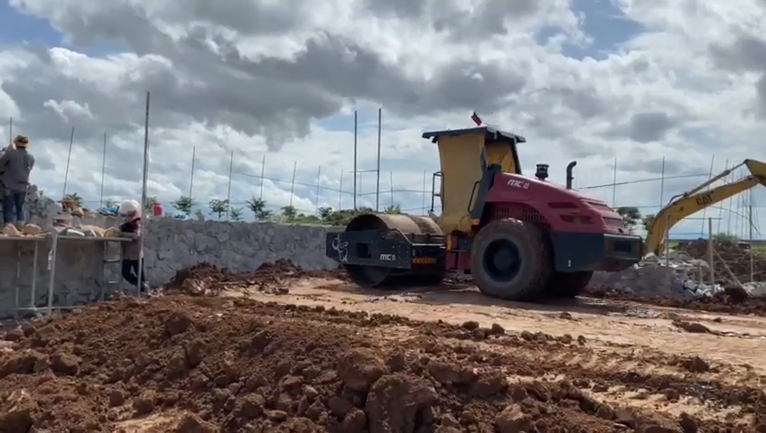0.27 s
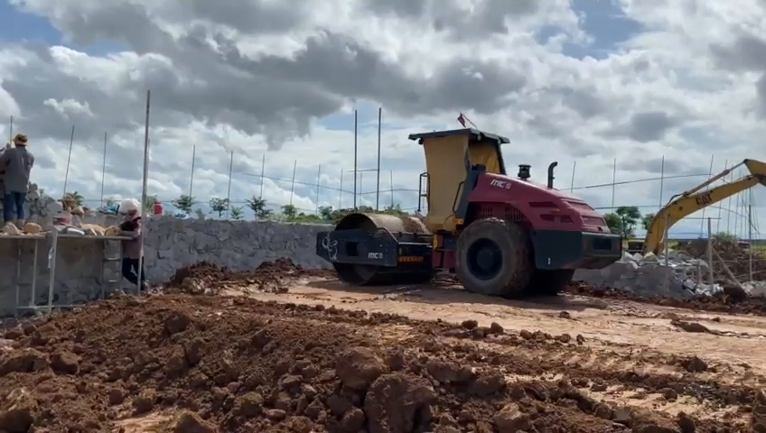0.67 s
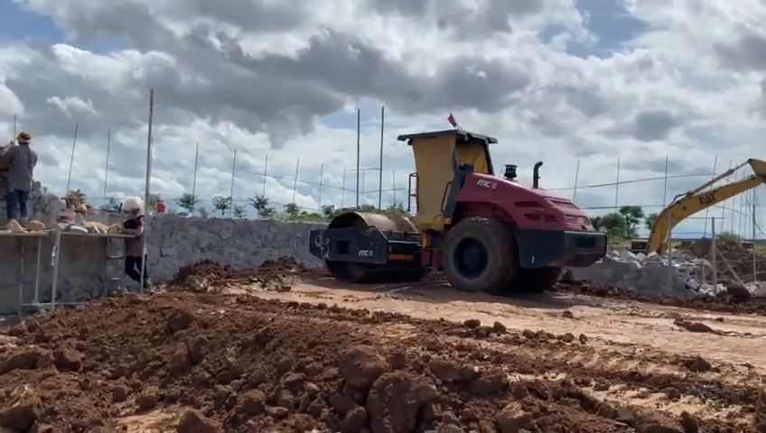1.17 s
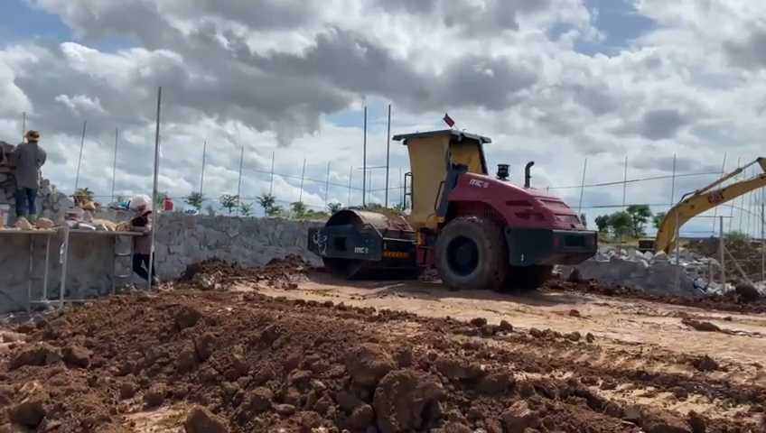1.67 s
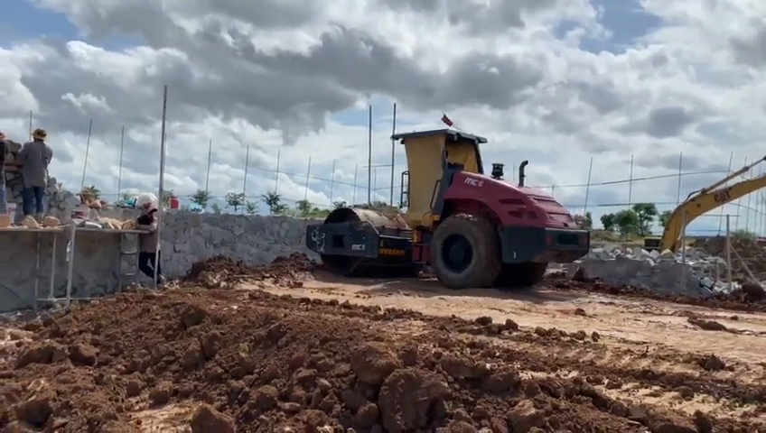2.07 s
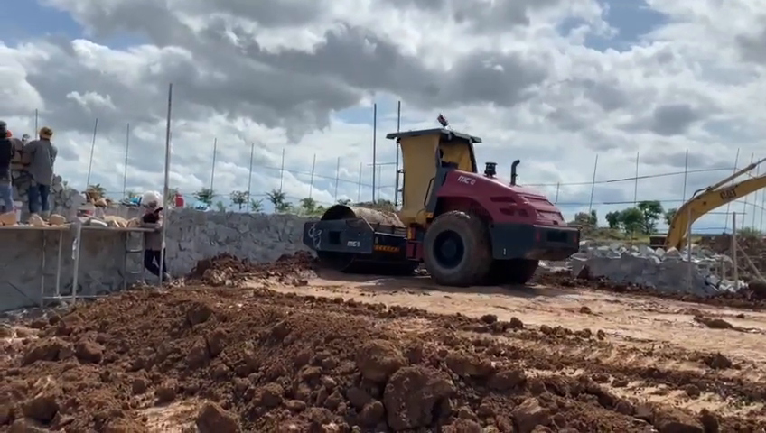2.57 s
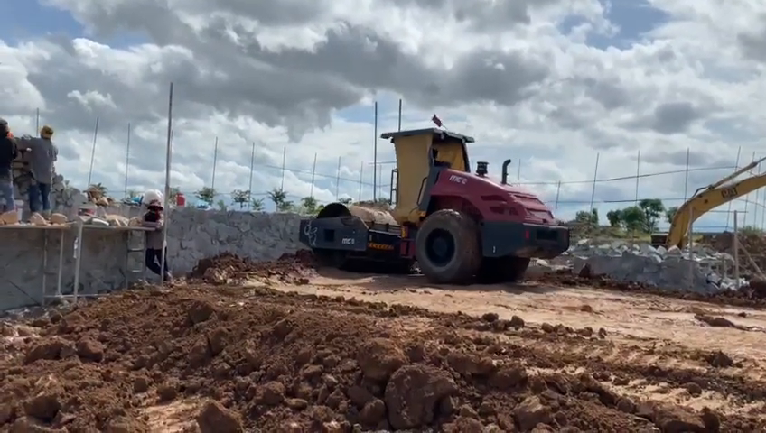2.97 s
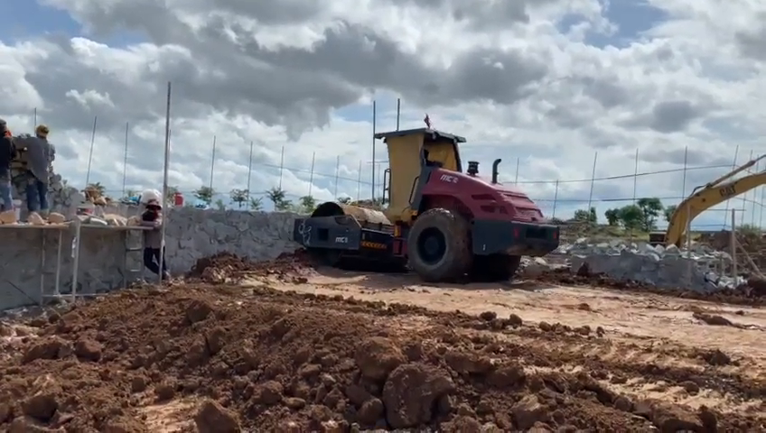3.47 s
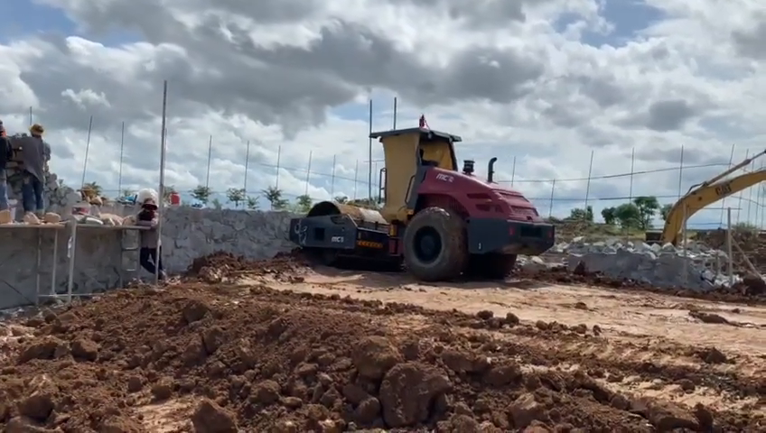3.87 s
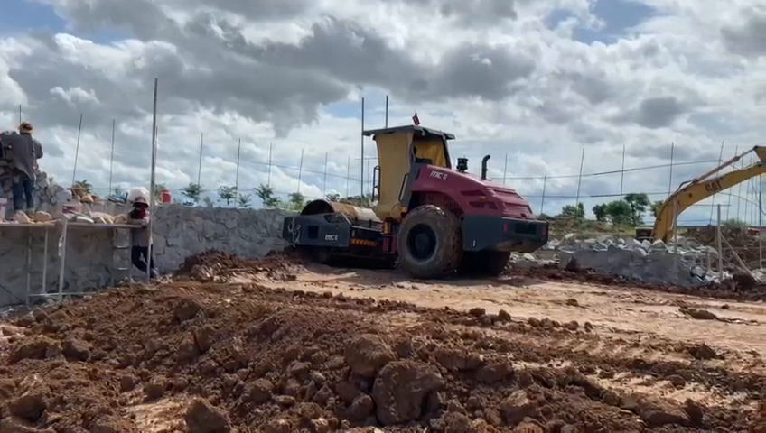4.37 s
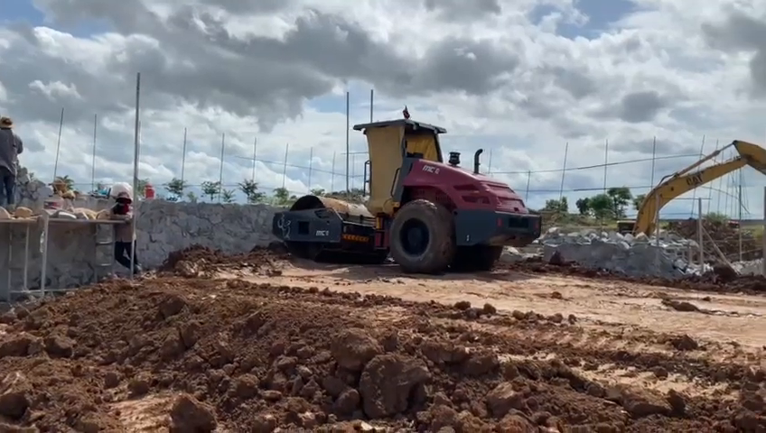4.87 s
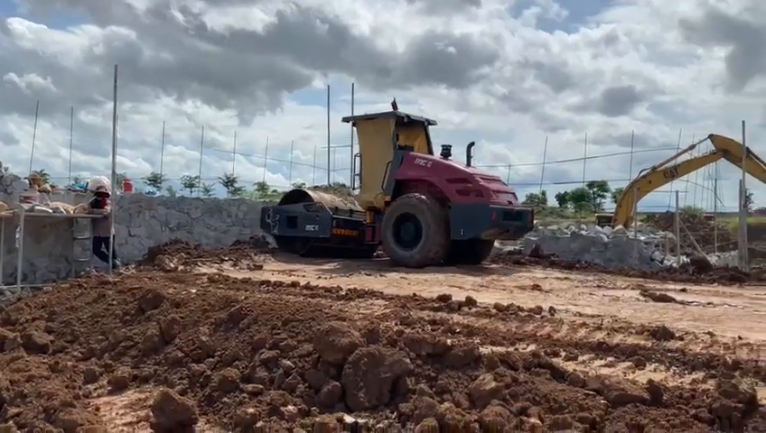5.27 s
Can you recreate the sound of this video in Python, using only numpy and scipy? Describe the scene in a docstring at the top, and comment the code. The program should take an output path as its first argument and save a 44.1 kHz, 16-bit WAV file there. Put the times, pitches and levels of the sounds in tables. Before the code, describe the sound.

A road roller's diesel engine runs for the whole five and a half seconds, a few metres away outdoors. A low exhaust drone and rumble carry a fast, slightly uneven clatter, with drumming hood panels, a light metallic ring and the rush of a cooling fan. The rumble swells briefly at about 0.6 seconds. Slightly harder knocks come through at about 0.4, 1.1 and 2.9 seconds, and the hum is strongest just after 2 seconds. From about 3 seconds the engine speeds up very slightly as it takes load, and a faint high sizzle grows. Near 3.9 seconds a thin, fluttering turbocharger whistle enters, a little to the left. It climbs until about 4.5 seconds, where the rumble swells again, then sinks slowly to the end. A faint breeze rumbles underneath throughout.

```python
"""A road roller's four-cylinder diesel engine drones near 1650 rpm as it creeps over dirt, metres away.
The exhaust hums at the rate the cylinders fire, over a low rumble. The firings also make the engine
block clatter, with a few harder knocks, the hood drum and a metal cover ring. The cooling fan roars.
Late on, the engine takes load and the turbocharger whistles up and sinks back. A faint breeze blows."""
import sys
import numpy as np
from scipy import signal
from scipy.fft import rfft, irfft
from scipy.io import wavfile
from scipy.ndimage import uniform_filter1d

SR = 44100
rng = np.random.default_rng(int(sys.argv[2]) if len(sys.argv) > 2 else 0)


def store_pcm(level_fs):
    """Save levels as 16-bit WAV."""
    pcm = np.round(np.clip(level_fs, -1, 1) * 32767).astype(np.int16)
    wavfile.write(sys.argv[1], SR, np.atleast_2d(pcm).T)


N = 243410
TIME = np.arange(N) / SR
BINS = np.fft.rfftfreq(N, 1 / SR)

# how fast the engine runs: (time [s], firing rate [Hz])
FIRING_RATE = [(0, 54.7), (0.55, 54.6), (0.72, 55.9), (1.5, 55.1), (2.95, 55.0), (3.35, 56.3), (4.5, 56.4),
               (4.9, 55.4), (5.52, 55.0)]
# how hard each of the four cylinders knocks, in firing order: (level [dB])
CYLINDER_LEVELS = [-0.5, -0.5, 0.9, 0.1]
# the exhaust's main hum: (time [s], level [dB])
DRONE_LEVEL = [(0, -22), (0.2, -21.5), (0.46, -28.5), (0.78, -23), (1, -21), (1.58, -25), (2.2, -16.5),
               (3.1, -19), (3.5, -21.5), (3.95, -19.3), (4.35, -22.5), (4.6, -19.5), (5.52, -17.5)]
# fainter engine tones that each swell or dip once:
# (pitch [times the firing rate], level [dB], middle of change [s], half length [s], change [dB])
ENGINE_TONES = [(0.506, -40, 4.1, 0.5, 3), (1.244, -36.5, 4.3, 0.6, 8.5), (1.323, -36, 2.7, 0.4, -12),
                (1.445, -47, 0.69, 0.2, 11), (2.003, -36, 1.7, 1.05, 5.5), (2.493, -38.5, 1.64, 1.4, 7),
                (3.005, -41, 1.4, 0.25, 12.5), (3.244, -42.5, 1.1, 0.85, 6), (3.864, -35.5, 3.87, 0.78, 4),
                (4.55, -42, 0.83, 0.3, 11), (6.004, -39, 4.12, 0.13, 12), (7.01, -44, 4.4, 0.67, 10),
                (7.37, -49, 2.55, 0.2, 12), (7.79, -41.5, 1.68, 0.17, 11.5), (15.56, -42.5, 1.3, 0.66, 2.5),
                (17.05, -48, 0.45, 0.43, 12), (28.74, -56, 4.4, 1, -6)]
# swells of the rumble as the engine takes load: (time [s], half length [s], rise [dB])
LOAD_SURGES = [(0.633, 0.17, 10.5), (4.546, 0.16, 7.5)]
# the tone colour of each noisy part: (frequency [Hz], relative level [dB])
RUMBLE_SPECTRUM = [(3, -15), (20, -10), (40, -9), (55, -7.5), (70, 0), (88, -1.5), (105, -3), (135, -16),
                   (160, -30), (400, -70)]
BOOM_SPECTRUM = [(50, -40), (90, -31), (120, -2), (175, 1.5), (205, -2), (260, -1), (292, -8), (400, -10.5),
                 (900, -74)]
HOOD_SPECTRUM = [(150, -74), (297, -13), (322, -2), (350, 0.5), (385, -3.5), (435, -3), (490, -5.5),
                 (520, -9.5), (570, -7.5), (620, -18), (900, -35), (2000, -75)]
BLOCK_SPECTRUM = [(300, -62), (630, -10), (750, -0.5), (870, -0.5), (1040, -1.5), (1140, -6), (1350, -8.5),
                  (1500, -10), (1650, -5.5), (2020, -15), (2150, -14.5), (2450, -13), (2740, -19.5),
                  (3000, -19.5), (6000, -47), (14000, -130)]
FAN_SPECTRUM = [(1000, -39), (2740, -6), (2880, 0.5), (3500, 1), (3750, -3.5), (4050, 0.5), (4380, -6.5),
                (4650, -2.5), (5000, -5), (5330, -4), (6150, -8.5), (6550, -7.5), (6900, -9), (8500, -10),
                (9600, -8.5), (11000, -16.5)]
SIZZLE_SPECTRUM = [(4300, -50), (5050, -17), (5300, 0), (5550, -9), (5900, -18), (6800, -50)]
BREEZE_SPECTRUM = [(20, 10), (60, -18), (140, 10), (250, -11), (600, -44)]
# how loud the body booms and a loose part sizzles: (time [s], level [dB])
BODY_BOOM_LEVEL = [(0, -28), (1.45, -26), (2.1, -26), (2.7, -32.5), (3.1, -28), (3.8, -29.5), (5.52, -30.5)]
METAL_SIZZLE_LEVEL = [(0, -58), (2.2, -56), (2.5, -57), (5.52, -46)]
# the notes of the metal cover: (pitch [Hz], half width [Hz], level [dB])
COVER_NOTES = [(2390, 125, -39.3), (2545, 90, -42.5)]
# the note of the turbocharger's blades: (time [s], pitch [Hz])
WHISTLE_PITCH = [(3.85, 5370), (4, 5755), (4.22, 6315), (4.33, 6490), (4.42, 6565), (4.54, 6580),
                 (4.66, 6540), (4.85, 6385), (5.05, 6175), (5.25, 6020), (5.52, 5895)]
# how loud that whistle is: (time [s], left level [dB], right level [dB])
WHISTLE_LEVEL = [(3.85, -52, -56), (3.96, -42, -48), (4.03, -35.5, -48), (4.11, -39, -46),
                 (4.22, -31.5, -41), (4.3, -42, -44), (4.35, -34, -43), (4.44, -58, -50),
                 (4.51, -38.5, -42), (4.6, -52, -48), (4.68, -33, -36), (4.82, -39, -44), (4.99, -32, -41),
                 (5.07, -36.5, -45), (5.16, -33.5, -44), (5.27, -33.5, -46), (5.36, -50, -50),
                 (5.52, -35.5, -43)]
# three harder knocks in the clatter, then two faint high ticks: (time [s], pitch [Hz], strength [dB])
KNOCKS_AND_TICKS = [(0.4, 900, -11.5), (1.121, 910, -16), (2.87, 845, -15), (3.243, 5370, -30),
                    (5.472, 6450, -30)]
# what reflections boost or cut, at the start and all along: (frequency [Hz], change [dB])
EARLY_COLOUR = [(300, 1.5), (460, 1), (600, 1.5), (720, 0.5), (920, -1.5), (1150, -7.5), (1300, 6.5),
                (1470, 3), (1700, -10), (1960, 8), (2130, 8.5), (2400, -9), (2750, 3), (3200, 0)]
SLOW_COLOUR = [(215, 1), (260, -0.5), (330, 1.5), (395, 0), (500, -2), (600, -1), (780, 0), (980, -2.5),
               (1150, 1), (1400, 0), (1620, 2.5), (1900, -3), (2400, 0), (2750, -1), (4050, 1), (5000, 0),
               (5330, -1), (6000, -1), (6600, 1.5), (7000, 0)]
# how much of the slow colour is mixed in; below zero reverses it: (time [s], amount [share])
SLOW_COLOUR_AMOUNT = [(0, -0.27), (1.3, -0.89), (2.2, -0.087), (4, 0.83), (5.52, -0.06)]
# how alike the left and right sides sound: (frequency [Hz], likeness [0 to 1])
SIDE_LIKENESS = [(140, 1), (250, 0.97), (430, 0.97), (600, 0.61), (850, 1), (1050, 0.8), (1300, 0.26),
                 (1650, 0.73), (2080, 0.072), (2450, 0.85), (3100, 0.046), (3550, 0.57), (4100, .9),
                 (4650, 0.72), (5100, 0.36), (5800, 0.36), (7000, 0.4), (7300, 0.98), (8300, 1), (9200, 1),
                 (10000, 1)]
# how much louder the left side is: (frequency [Hz], left minus right [dB])
LEFT_BOOST = [(60, -7), (200, 0), (400, -1.6), (630, 3.5), (880, -0.5), (1150, 4), (1450, 7), (1950, -2.5),
              (2150, 5), (2450, -0.5), (3000, 2.5), (4100, 1), (5000, 4), (6000, 4.5), (7000, -0.5),
              (11000, 0)]
# how far the left wave runs ahead of the right: (frequency [Hz], phase [radians])
LEFT_LEAD = [(150, 0), (430, 0.24), (600, 0), (720, 0), (950, 0.05), (1150, 0.56), (1600, -0.9),
             (1900, -0.8), (2450, 0.5), (2750, 1.5), (3400, 0), (4500, 0.43), (7100, 0.5), (7450, -1.5),
             (8300, -4.5), (8900, -2), (9650, -8), (11000, -4.5)]


def exhaust_drone(firings, trim_db=0.3, waver_db=0.6):
    """Exhaust puffs blend into a hum; the turning shafts add fainter tones."""
    hum_db = curve(DRONE_LEVEL) + trim_db + waver_db * wander(6.5)
    drone = amp(hum_db) * np.sin(2 * np.pi * firings)
    for multiple, db, middle_s, half_s, change_db in ENGINE_TONES:
        phase = 2 * np.pi * (multiple * firings + rng.random())
        phase += 0.037 * multiple * wander(10)  # higher tones waver more
        tone_db = db + change_db * hump(middle_s, half_s) + 1.56 * wander(5.9)
        drone += amp(tone_db) * np.sin(phase)
    return np.sqrt(2) * drone


def rumble_and_hood(firings, set_rate_hz=55):
    """Swirling gas rumbles in the exhaust pipe, the body booms and the hood panels drum."""
    extra_hz = curve(FIRING_RATE) - set_rate_hz
    surge_db = sum(db * hump(s, half_s) for s, half_s, db in LOAD_SURGES)
    rumble = radiate(rng.standard_normal((2, N)), RUMBLE_SPECTRUM, -32 - 0.2 * extra_hz + surge_db)
    boom = radiate(rng.standard_normal((2, N)), BOOM_SPECTRUM, curve(BODY_BOOM_LEVEL))
    drumming = knocks(firings, repeat=0.1, depth=0.22, decay=0.3, uneven_db=7)
    # the hood gets louder with engine speed, and slowly as the roller moves
    hood_db = -26.5 + 0.5 * extra_hz + 0.15 * (TIME - TIME.mean())
    return rumble + boom + radiate(drumming, HOOD_SPECTRUM, hood_db)


def block_clatter(firings):
    """Burning fuel knocks in the engine block; unequal cylinders make the beat limp."""
    blows = knocks(firings, repeat=0.22, depth=0.18, decay=0.32, uneven_db=6)
    return radiate(blows, BLOCK_SPECTRUM, -25 + cylinder_db(firings) + 0.33 * wander(14))


def cooling_fan(firings, gust_db=0.4):
    """Cooling air rushes through the hood, pulsing slightly with the firings."""
    rush = knocks(firings, repeat=0.08, depth=0.15, decay=0.3, uneven_db=5)
    return radiate(rush, FAN_SPECTRUM, -37.5 + gust_db * wander(24))


def cover_ring(firings, swell_db=1.9):
    """The firings ring a metal cover; each of its notes swells and fades on its own."""
    sound = 0
    for hz, half_width_hz, db in COVER_NOTES:
        blows = knocks(firings, repeat=0.25, depth=0.3, decay=0.3, uneven_db=6)
        peak_db = -20 * np.log10(1 + ((BINS - hz) / half_width_hz) ** 4)
        level_db = db + cylinder_db(firings) / 2 + swell_db * wander(13)
        sound += radiate(blows, np.transpose([BINS, peak_db]), level_db)
    return sound


def turbo_whistle(spool_s=0.1, scatter=0.55, flutter_hz=60):
    """Spinning blades whistle; scattered copies mix with the direct tone and make it flutter."""
    # the rotor needs time to change speed, which smooths the glide
    hz = uniform_filter1d(curve(WHISTLE_PITCH), int(spool_s * SR), mode="nearest")
    phase = 2 * np.pi * np.cumsum(hz + 14 * wander(70)) / SR
    started = TIME > WHISTLE_PITCH[0][0]
    tone = started * np.exp(1j * phase)
    sides = []
    for column in (1, 2):  # left, right
        flutter = 1 + scatter * (wander(flutter_hz) + 1j * wander(flutter_hz))
        sides.append(amp(curve(WHISTLE_LEVEL, column)) * (tone * flutter).real)
    return np.array(sides)


def hard_knocks_and_ticks(rise_s=0.004, decay_s=0.009):
    """A few harder knocks in the engine's clatter and two faint high ticks, each a brief ring."""
    sound = 0
    for start_s, hz, db in KNOCKS_AND_TICKS:
        age = np.maximum(TIME - start_s, 0)
        ring = np.sin(2 * np.pi * hz * age + wander(290))  # a fast wobble roughens the note
        envelope = (1 - np.exp(-age / rise_s)) * np.exp(-age / decay_s)
        sound += amp(db) * envelope * ring
    return sound


def sizzle(firings):
    """A light, loose part sizzles as the firings shake it."""
    shaking = knocks(firings, repeat=0, depth=0.5, decay=0.4, uneven_db=6)
    return radiate(shaking, SIZZLE_SPECTRUM, curve(METAL_SIZZLE_LEVEL) + wander(14))


def reflections(sound, hold_s=0.31, fade_s=0.14):
    """Sound bouncing off ground and walls changes the tone colour as the roller creeps along."""
    early_amount = np.interp(TIME, [hold_s, hold_s + fade_s], [1, 0.11])
    early = early_amount * (colour(sound, EARLY_COLOUR) - sound)
    slow = curve(SLOW_COLOUR_AMOUNT) * (colour(sound, SLOW_COLOUR) - sound)
    return sound + early + slow


def breeze(level_db=-44, gust_db=2):
    """Moving air rumbles faintly, with its own noise on each side."""
    air = np.array([unit(colour(rng.standard_normal(N), BREEZE_SPECTRUM)) for _ in range(2)])
    return amp(level_db + gust_db * wander(2.2)) * air


def knocks(firings, repeat, depth, decay, uneven_db, size=3200):
    """Noise that jumps at each firing; the share `repeat` comes back alike every four firings."""
    patterns = rng.standard_normal((2, size))
    cycles = (firings + 0.0037 * wander(14.6)) / 4
    place = (cycles % 1) * size
    alike = np.array([unit(np.interp(place, np.arange(size), pattern)) for pattern in patterns])
    rattle = np.sqrt(repeat) * alike + np.sqrt(1 - repeat) * rng.standard_normal((2, N))
    beat = np.abs(firings + 0.17 * wander(22))  # each burst comes a little early or late
    force = amp(uneven_db * rng.uniform(-1, 1, N)[beat.astype(int)])
    burst = np.exp(-(beat % 1) / decay)  # decay is counted in firings
    return unit(rattle * (1 + depth * force * burst))


def cylinder_db(firings):
    """Strength of the cylinder that is firing, in dB."""
    return np.interp(firings, np.arange(4) + 0.5, CYLINDER_LEVELS, period=4)


def radiate(shaking, spectrum, level_db):
    """Shaking takes on the tone colour of one machine part and spreads to both sides."""
    pair = left_and_right(colour(shaking, spectrum))
    return amp(level_db) * pair / pair.mean(0).std()


def left_and_right(pair):
    """Turns two unrelated signals into stereo: direct sound is shared, scattered sound is not."""
    direct, scattered = rfft(pair)
    apart = 1 - np.exp(-(BINS / 150) ** 4)  # deep sounds reach both sides alike
    same = 1 - apart * np.clip(1 - shape(SIDE_LIKENESS), 0, 1)
    mid = direct * np.sqrt((1 + same) / 2)
    side = scattered * np.sqrt((1 - same) / 2)
    tilt = amp(apart * shape(LEFT_BOOST) / 2) * np.exp(1j * apart * shape(LEFT_LEAD) / 2)
    return irfft(np.array([(mid + side) * tilt, (mid - side) / tilt]), N)


def amp(db):
    """Turns decibels into a multiplier."""
    return 10 ** (np.asarray(db) / 20)


def unit(x):
    """Scales a signal to a typical size (rms) of 1."""
    return x / np.sqrt(np.mean(x ** 2) + 1e-20)


def curve(rows, column=1):
    """Reads one column of a time table at every sample."""
    rows = np.asarray(rows)
    return np.interp(TIME, rows[:, 0], rows[:, column])


def shape(points):
    """Reads a frequency table at every frequency, joining its points on a log scale."""
    hz, value = np.transpose(points)
    return np.interp(np.log(BINS + 1), np.log(hz + 1), value)


def colour(x, spectrum):
    """Boosts or cuts each frequency by a table in dB."""
    return irfft(rfft(x) * amp(shape(spectrum)), N)


def wander(rate_hz):
    """A random drift of typical size 1; a higher rate moves faster."""
    smoothing = np.exp(-(BINS / rate_hz) ** 2) * (BINS > 0)
    return unit(irfft(rfft(rng.standard_normal(N)) * smoothing, N))


def hump(middle_s, half_s):
    """A smooth rise to 1 and back."""
    return np.exp(-((TIME - middle_s) / half_s) ** 2)


def scene():
    """Adds all the sounds; one running count of firings keeps the engine's beat in step."""
    firings = np.cumsum(curve(FIRING_RATE)) / SR
    body = rumble_and_hood(firings) + block_clatter(firings)
    body += cooling_fan(firings) + cover_ring(firings)
    engine = exhaust_drone(firings) + reflections(body) + sizzle(firings)
    return engine + hard_knocks_and_ticks() + turbo_whistle() + breeze()


def record(dry):
    """Cuts the highest treble, above 11150 Hz."""
    low_pass = signal.firwin(511, 11150, window=("kaiser", 9), fs=SR)
    return signal.oaconvolve(dry, low_pass[None], "same")


dry = scene()
out = record(dry)
store_pcm(out)
```